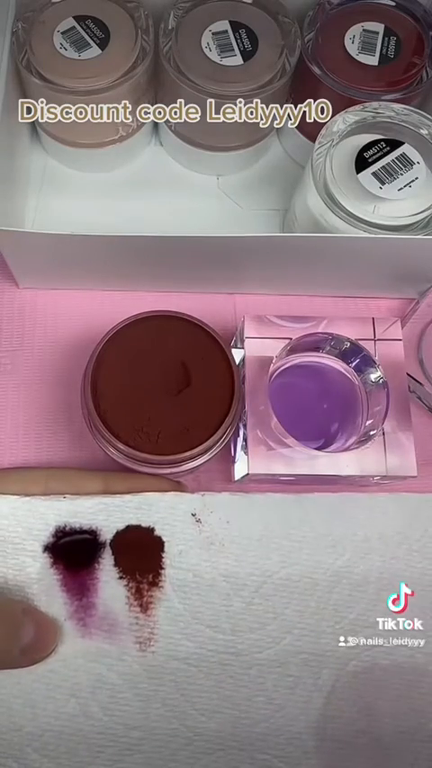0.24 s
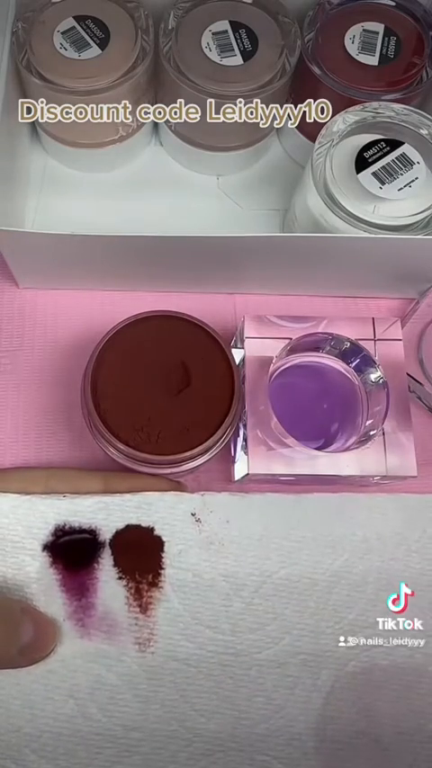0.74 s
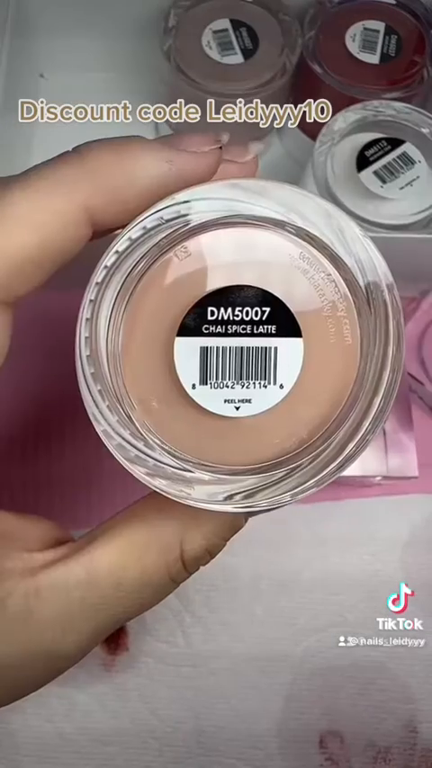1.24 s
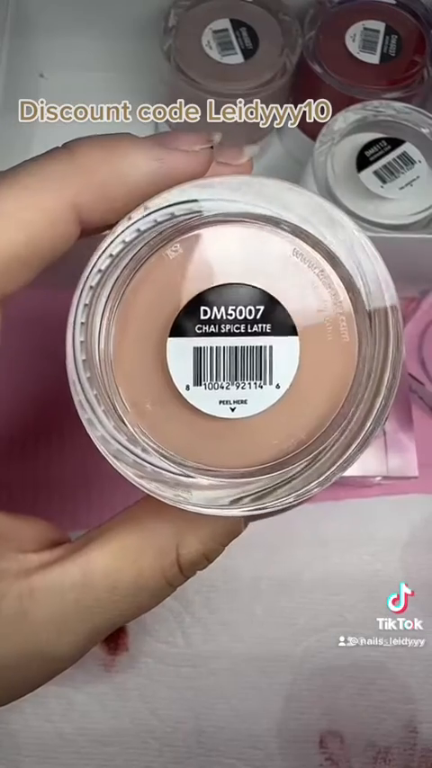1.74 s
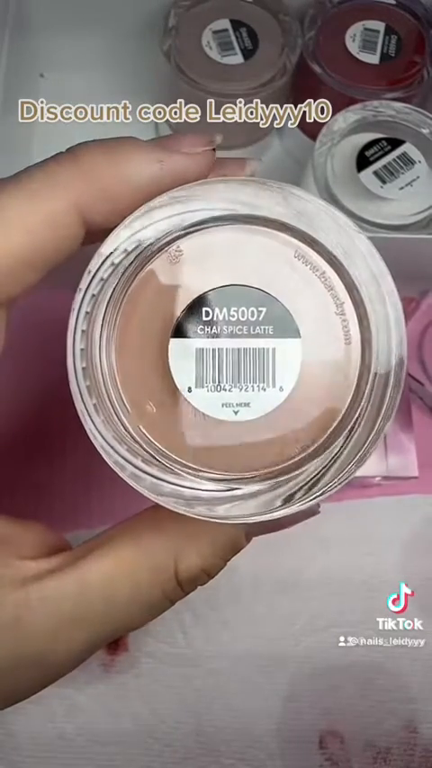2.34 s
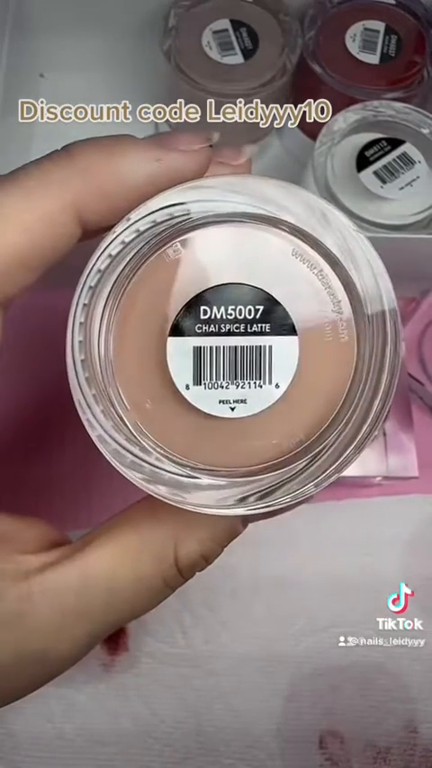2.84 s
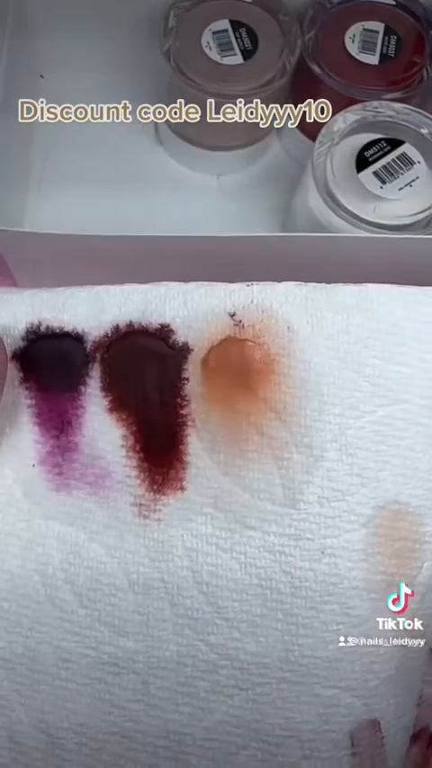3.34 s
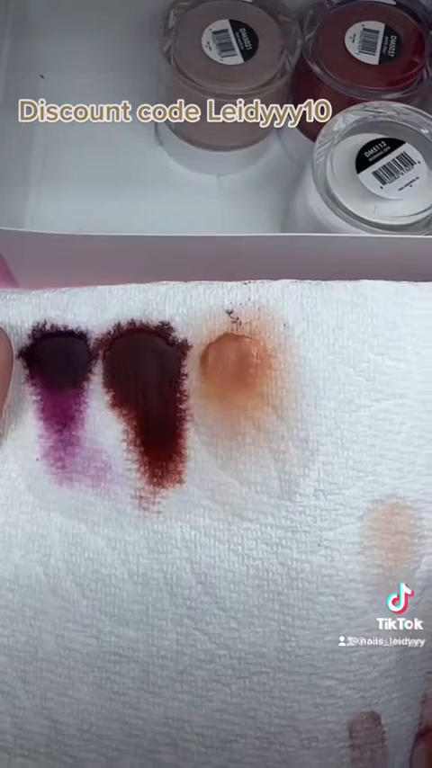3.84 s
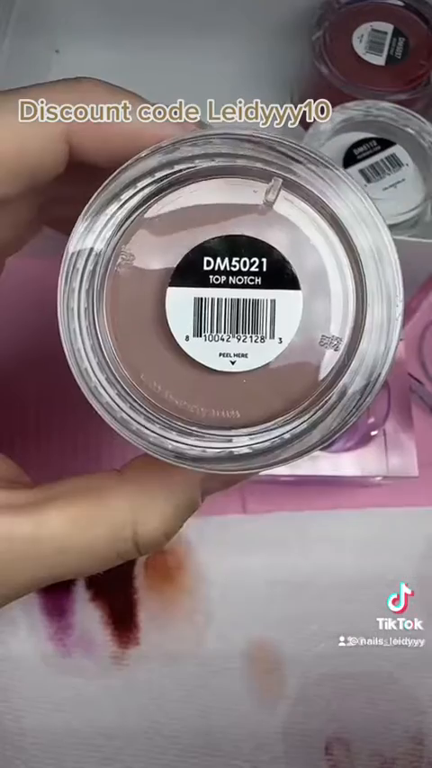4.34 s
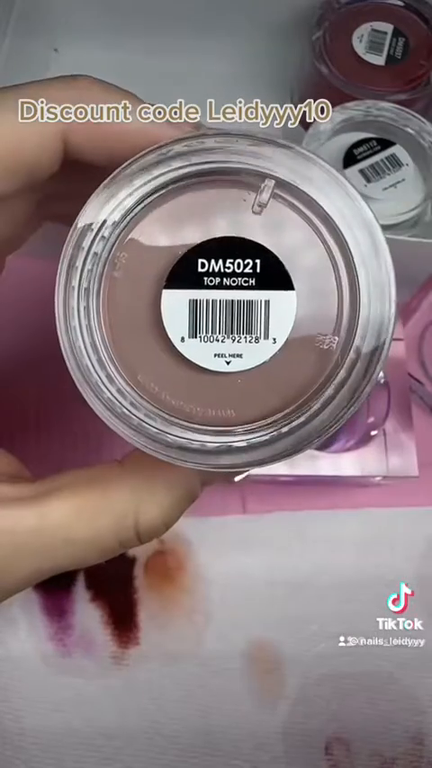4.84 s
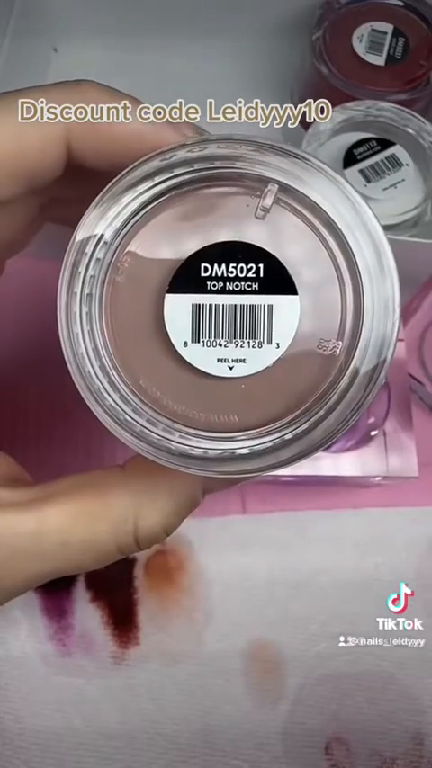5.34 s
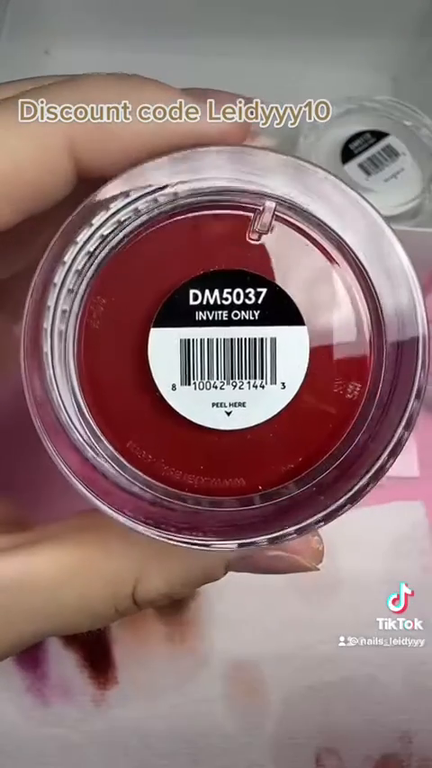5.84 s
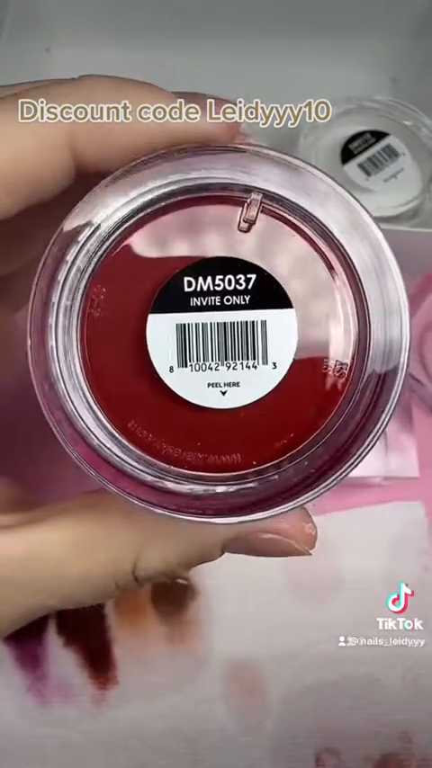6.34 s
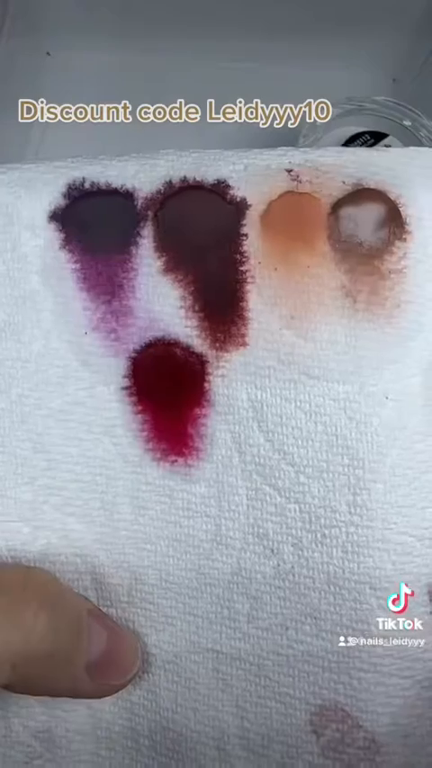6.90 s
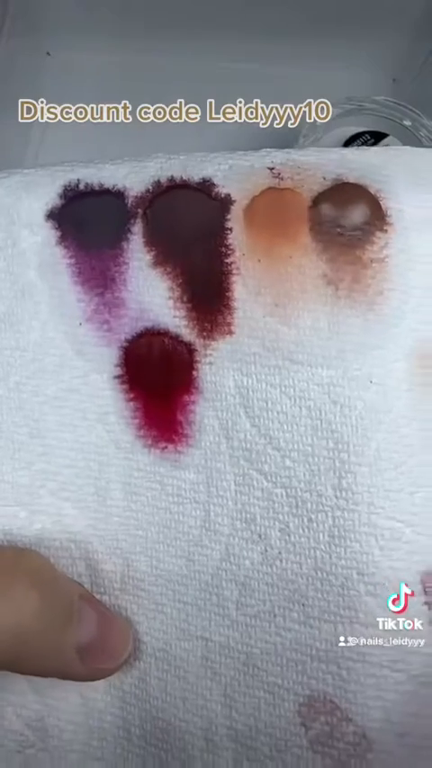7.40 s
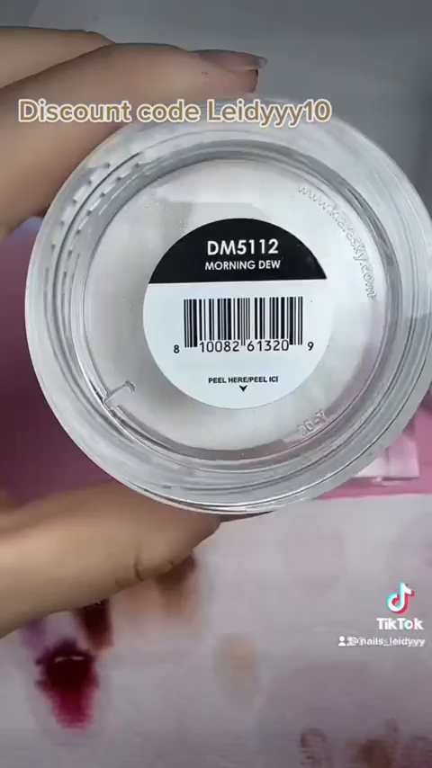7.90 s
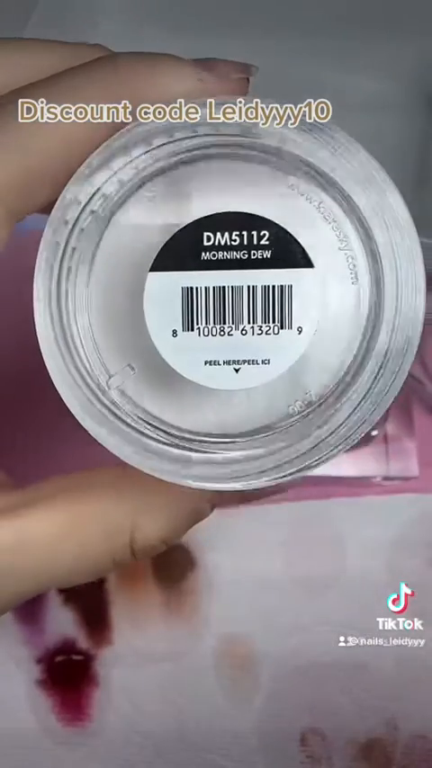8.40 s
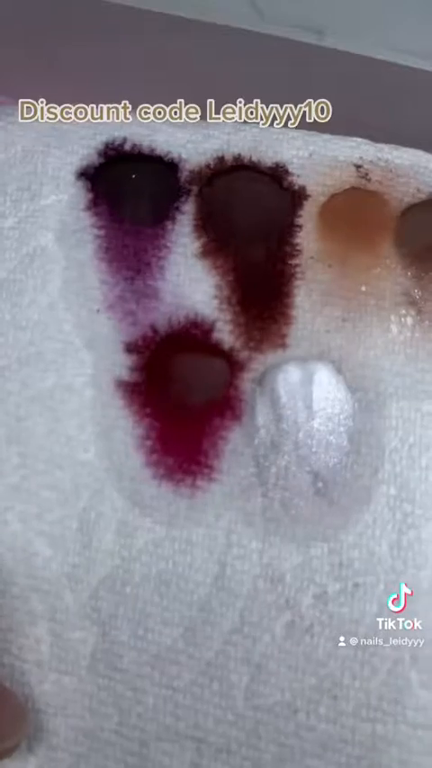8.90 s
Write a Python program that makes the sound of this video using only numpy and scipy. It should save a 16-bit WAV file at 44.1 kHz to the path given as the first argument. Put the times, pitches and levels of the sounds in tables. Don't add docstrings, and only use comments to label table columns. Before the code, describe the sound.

Indoors, a phone picks up continuous fan noise: deep electrical hum, wavering blade tones, a thin whine and breathy air. It opens fairly loud with very faint dry paper rustles, then drops out and resumes softer, repeatedly broken by tiny gaps with small clicks at restarts. One crisp nail tap on a plastic jar lands in the third passage, a much weaker one in the next. It ends from another spot, fuller and muffled.

```python
import sys
import numpy as np
from scipy import signal
from scipy.fft import rfft, irfft
from scipy.io import wavfile
from scipy.ndimage import uniform_filter1d

SR = 44100
rng = np.random.default_rng(int(sys.argv[2]) if len(sys.argv) > 2 else 0)


def amplitude_ratio(level_db):
    exponent = np.asarray(level_db, float) / 20
    return 10 ** exponent


def digitize_waveform(pressure):
    field = np.atleast_2d(pressure).T
    bounded = np.clip(field, -1, 1)
    quanta = np.round(bounded * 32767).astype(np.int16)
    wavfile.write(sys.argv[1], SR, quanta)


N = 403956
T = np.arange(N) / SR
BIN_HZ = np.arange(N // 2 + 1) * SR / N
MAINS_HZ, SHAFT_HZ, ROTOR_HZ = 60, 36.83, 58.995

# (start [s], end [s], motor hum [dB], creep of gain [dB/s], starting jump [-1..1])
PASSAGES = [
    (0, 0.8964, -33, -1, 0),
    (1.0497, 2.9506, -37, 0.87, -0.0091),
    (3.0932, 4.1407, -37, 2.5, -0.014),
    (4.287, 5.505, -37, 2.24, -0.016),
    (5.649, 6.8037, -36.8, 0.56, -0.0092),
    (6.9414, 7.8198, -36.5, 0.3, -0.047),
    (7.9667, 8.517, -37.5, 3, 0.053),
    (8.583, 9.2, -32.5, -1, -0.027),
]
# (blade tone [dB], tone one turn below it [dB], top hiss [dB], rotor [dB], whine [dB])
SPOT_LEVELS = [
    (-2.5, -9, -35, 2, 1.5),
    (-10.5, -14, -39, 2.5, 1.5),
    (-3.5, -12.5, -38, -3.5, -3.5),
    (-3, -8, -38, -1.5, -2),
    (-7, -9.5, -38, -3, 2),
    (-15.5, -14, -34, 1, 5),
    (-6, -6.5, -39, 0, 3),
    (-15, -11, -54.5, -8, -20),
]
# (time [s], change of blade tone [dB], change of tone one turn below it [dB])
BLADE_GUSTS = [(0.0, -16, -11), (0.11, 3.5, -2), (0.23, 0, -8.5), (0.39, 3.5, 3.5), (0.55, -5.5, -10),
               (0.74, 4.5, 6.5), (1.4, 9.5, -5), (1.82, 6, -5), (2.18, 7, -3), (2.92, 4, 12),
               (3.34, 5.5, 4), (3.9, 4, 0), (4.01, -11, -2.5), (4.47, -4, -2), (4.81, 4.5, 4),
               (5.32, 2, 2.5), (5.73, -4, 4.5), (5.85, 8, 0), (6.42, 5.5, -2), (6.62, 4, 2),
               (6.77, -11, -11), (7.42, 12, 4), (7.78, -2, 10.5), (8.0, -13, 0), (8.16, -2, 8.5),
               (8.64, 6, -8), (8.8, 3, 2)]
# (multiple [1], level re hum [dB])
SHAFT_HARMONICS = [(1, -24), (2, -12), (3, -23), (6, -29.5)]
# (multiple [1], level [dB])
ROTOR_HARMONICS = [(13, -63), (14, -61.5), (16, -60), (19, -67), (20, -68), (23, -65), (28, -73.5),
                   (37, -70), (38, -66.5), (42, -74.5), (45, -72), (68, -82), (80, -83.5), (90, -87.5),
                   (92, -85), (93, -85), (94, -83.5), (96, -80), (98, -88), (99, -79.5), (107, -84),
                   (110, -85)]
# (frequency [Hz], level [dB])
MOTOR_WHINES = [(4131.5, -72), (9644, -90), (13778, -90)]
# (frequency [Hz], density [dB per Hz])
AIR_SPECTRUM = [(18, -52), (40, -38.5), (100, -33.5), (190, -35), (270, -38.5), (400, -33), (700, -37.5),
                (1050, -42), (1500, -40), (2000, -47), (3300, -52), (4600, -54), (6400, -59), (6600, -62)]
# (frequency [Hz], density [dB per Hz])
AIR_TREBLE = [(6400, -60), (8300, -65), (9300, -65), (10600, -70.5), (11000, -72.5), (11900, -75),
              (12100, -73.5), (12900, -74.5)]
# (frequency [Hz], width [Hz], level over the air [dB])
RESONANCES = [(57.1, 8.8, 14.5), (74, 10, 4), (147, 17, 7), (172, 22, 7.5), (214, 23.4, 11.5),
              (243, 22, 6.5), (301, 15, 17), (338.2, 34.3, 18), (369.4, 38, 8), (387, 13, 7.5),
              (461.6, 37, 10.5), (539.6, 21.6, 12.5), (576.5, 15, 9), (618, 24, 6.5), (691, 16, 5),
              (754, 39, 6), (794.6, 17, 8.5), (850, 55, 1.5), (940, 24, 7.5), (985, 23, 6), (1080, 50, 3),
              (1131.5, 34, 8), (1180, 16, 6.5), (1250, 77, 2.5), (1350, 46, 6), (1640, 55, -0.5),
              (2400, 98, -11.5), (2480, 140, 0), (2705, 48, 2), (4080, 140, -8.5)]
# (frequency [Hz], gain [dB])
LAST_COLOUR = [(150, 6), (250, 4), (500, 2.5), (900, 2.5), (1400, -3.5), (1800, 2.5), (2400, 4), (3500, -1),
               (5500, 3.5), (8000, 1.5), (10800, -3.5), (11500, -37)]
# (frequency [Hz], gain [dB])
LAST_DIFFERENCE = [(160, -70), (260, -22), (500, -13), (800, -4.5), (1300, -4), (1900, -18), (2150, -70),
                   (8900, -70), (9200, -8), (10400, -15), (10700, -70)]
# (time [s],
# length [s], centre [Hz], width [Hz], level [dB])
RUBS_AND_SWELLS = [(0, .33, 14400, 2700, -69), (.093, .07, 14400, 2700, -68), (.12, .043, 9700, 800, -70),
                   (.187, .024, 9300, 1500, -66), (.187, .024, 14700, 1500, -71), (.37, .05, 14400, 2700, -71),
                   (.605, .045, 14400, 2700, -71), (.79, .024, 14000, 1800, -69), (6.99, .06, 14400, 2700, -72),
                   (7.268, .026, 14400, 2700, -64), (7.268, .026, 12000, 2000, -79),
                   (3.975, .03, 1700, 1500, -50), (4.55, .17, 2400, 900, -60), (9.05, .07, 2450, 400, -58)]
# (time [s], peak level [dB])
NAIL_TAPS = [
    (3.3792, -36.5),
    (4.695, -54),
]
# (frequency [Hz], level [dB], decay time t60 [s])
PLASTIC_MODES = [(3180, -1, .022), (3650, -3, .006), (4150, 1, .008), (4750, 1, .01), (9000, -15, .006),
                 (14200, -15, .007)]


def shape(points, hz):
    f, db = np.transpose(points)
    return amplitude_ratio(np.interp(np.log(hz + 1), np.log(f), db))


def noise(gain):
    return irfft(rfft(rng.standard_normal(N)) * gain, N)


def band_noise(hz, width):
    x = noise(abs(BIN_HZ - hz) < width / 2)
    return x / np.sqrt(np.mean(x ** 2))


def walk(rate, smooth=True):
    k = int(SR / rate)
    held = np.repeat(rng.standard_normal(N // k + 1), k)[:N]
    if not smooth:
        return held
    return 1.89 * uniform_filter1d(uniform_filter1d(held, k), k)


def tone(hz, wander_db, wander_rad, rate=6.):
    phase = 2 * np.pi * (hz * T + rng.random()) + wander_rad * walk(rate)
    return np.sqrt(2) * amplitude_ratio(wander_db * walk(rate)) * np.sin(phase)


def gusts():
    half_width_s = .05
    s, *changes_db = np.transpose(BLADE_GUSTS)
    coarse = T[::64]
    bell = np.exp(-((coarse - s[:, None]) / half_width_s) ** 2)
    return [np.interp(T, coarse, db @ bell) + 1.2 * walk(9.0) for db in changes_db]


def hum():
    return tone(2 * MAINS_HZ, 0.37, 0.074) + amplitude_ratio(-25.0) * tone(4 * MAINS_HZ, 2.5, .4)


def shaft():
    return sum(amplitude_ratio(db) * tone(k * SHAFT_HZ, 1.5, 0.36) for k, db in SHAFT_HARMONICS)


def blades(blade_db, below_db):
    wheel = 2 * np.pi * SHAFT_HZ * T + .02 * walk(4.1)
    out = 0
    for k, db in [(8, below_db + 0.5), (9, blade_db), (10, blade_db - 18.5)]:
        out = out + np.sqrt(2) * amplitude_ratio(db) * np.cos(k * wheel + 0.13 * walk(8.))
    return out


def rotor():
    return sum(amplitude_ratio(db + 31.0) * tone(k * ROTOR_HZ, 2.3, 0.44) for k, db in ROTOR_HARMONICS)


def whine():
    return sum(amplitude_ratio(db + 34.0) * tone(hz, 1.2, 0.63, rate=14.) for hz, db in MOTOR_WHINES)


def air(last):
    rings = 1
    for f, width, db in RESONANCES:
        rings = rings + amplitude_ratio(db) ** 2 / (1 + ((BIN_HZ - f) / (width / 2)) ** 4)
    treble = shape(AIR_TREBLE, BIN_HZ) * (BIN_HZ < 13050)
    gain = np.sqrt(rings) * np.where(BIN_HZ < 6500, shape(AIR_SPECTRUM, BIN_HZ), treble)
    reference = (BIN_HZ > 900) & (BIN_HZ < 9000)
    gain = gain / np.sqrt(np.sum(gain[reference] ** 2) / len(BIN_HZ))
    colour = shape(LAST_COLOUR, BIN_HZ)
    octave = np.log2(BIN_HZ / 20 + 1e-3)
    turn = np.cos(2 * np.pi * SHAFT_HZ * T)
    mid = 0
    for k in range(11):
        band = gain * np.sqrt(np.clip(1 - abs(octave - k), 0, 1))
        throb = 1 + turn * (.3 if k == 4 else .09 if k < 8 else .04)
        rush = np.where(last, noise(band * colour), noise(band))
        mid = mid + throb * amplitude_ratio(0.78 * walk(9.)) * rush
    side = last * noise(gain * colour * shape(LAST_DIFFERENCE, BIN_HZ))
    return mid, side


def top_hiss():
    return amplitude_ratio(1.2 * walk(43., smooth=False)) * band_noise(14300, 2700)


def rubs():
    out = np.zeros(N)
    for s, length, hz, width, db in RUBS_AND_SWELLS:
        out += amplitude_ratio(db) * band_noise(hz, width) * ((T > s) & (T < s + length))
    return out


def taps():
    out = np.zeros(N)
    for s, db in NAIL_TAPS:
        t = np.clip(T - s, 0, 1)
        onset = np.tanh(t / .0003)
        for f, mode_db, t60 in PLASTIC_MODES:
            out += amplitude_ratio(db + mode_db) * np.sin(2 * np.pi * f * t) * onset * 1000. ** (-t / t60)
    return out


def air_edge():
    out = 0
    for hz, bar in [(11100, -.7), (11400, .2), (12800, 1.1)]:
        out = out + amplitude_ratio(-46) * band_noise(hz, 300) * (walk(12., smooth=False) > bar)
    return out


def scene():
    passage = np.searchsorted([row[0] for row in PASSAGES], T, side="right") - 1
    start, _, hum_db, creep_db, _ = np.array(PASSAGES)[passage].T
    blade_db, below_db, hiss_db, rotor_db, whine_db = np.array(SPOT_LEVELS)[passage].T
    last = passage == len(PASSAGES) - 1
    gain = amplitude_ratio(hum_db + creep_db * (T - start))
    air_gain = amplitude_ratio(np.where(last, -19.5, -13.5))
    blade_gust_db, below_gust_db = gusts()
    motor = hum() + shaft() + blades(blade_db + blade_gust_db, below_db + below_gust_db)
    motor = motor + amplitude_ratio(rotor_db) * rotor() + amplitude_ratio(whine_db) * whine()
    motor = motor * amplitude_ratio(0.57 * walk(8.0))
    mid, side = air(last)
    mid = motor + air_gain * (mid + last * air_edge()) + amplitude_ratio(hiss_db) * top_hiss()
    side = air_gain * side
    return gain * np.array([mid + side, mid - side]) + rubs() + taps()


def dropouts(x, share, lo_hz, hi_hz):
    hz, _, z = signal.stft(x, SR, nperseg=1024)
    lost = rng.random((len(hz) // 3 + 1, z.shape[-1] // 4 + 1)) < share
    lost = np.kron(lost, np.ones((3, 4)))[:len(hz), :z.shape[-1]]
    lost = lost * ((hz > lo_hz) & (hz < hi_hz))[:, None]
    lost = lost * (abs(z) < 3.5 * np.median(abs(z), axis=-1, keepdims=True))
    return signal.istft(z * (1 - lost), SR, nperseg=1024)[1][..., :N]


def low_pass(x):
    return signal.sosfilt(signal.butter(12, 16470, fs=SR, output="sos"), x)


def record(dry):
    on, smear, hiss = np.zeros(N), np.zeros(N), np.zeros(N)
    dry = dropouts(dry, .035, 3000, 6500)
    jumps = np.zeros_like(dry)
    for start, end, *_, jump in PASSAGES:
        since, after = T - start, T - end
        on += (since >= 0) * np.clip(-after / 0.0014, 0, 1)
        grip = (since >= 0) * np.exp(-np.clip(since, 0, 1) / .0005) * (start > 0)
        jumps += grip * (jump - dry)
        smear += (after > 0) * amplitude_ratio(-26.5) * np.clip(1 - after / 0.047, 0, 1) ** 2
        smear += (since < 0) * amplitude_ratio(-39.5) * np.clip(1 + since / 0.011, 0, 1) ** 2
        hiss += (after > 0) * (amplitude_ratio(-75.5) * (after < .011) + amplitude_ratio(-99.0) * (after < .085))
        hiss += (since < 0) * (amplitude_ratio(-88) * (since > -.006) + amplitude_ratio(-101) * (since > -.055))
    dull = signal.lfilter([.3], [1, -.7], dry)
    hiss = hiss * amplitude_ratio(3 * walk(90., smooth=False)) * band_noise(11100, 9300)
    top = signal.ellip(10, .1, 60, 15780, fs=SR, output="sos")
    mix = signal.sosfilt(top, on * dry + jumps + smear * dull + hiss)
    return low_pass(mix)


dry = scene()
out = record(dry)
digitize_waveform(out)
```